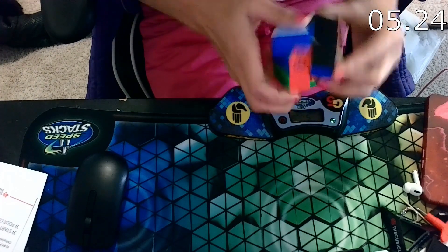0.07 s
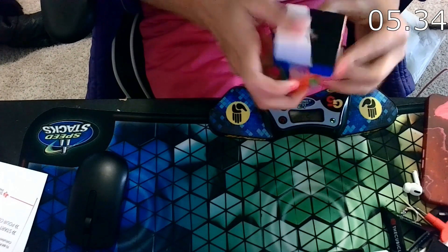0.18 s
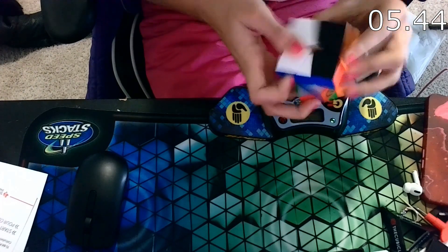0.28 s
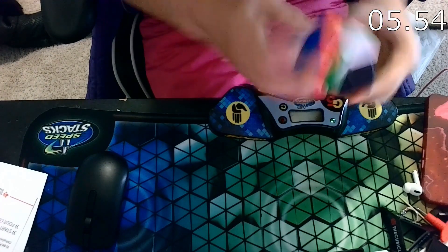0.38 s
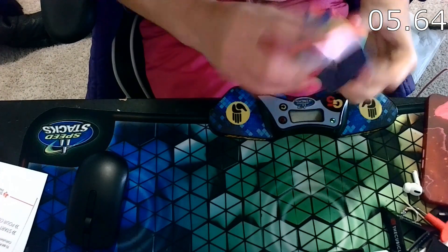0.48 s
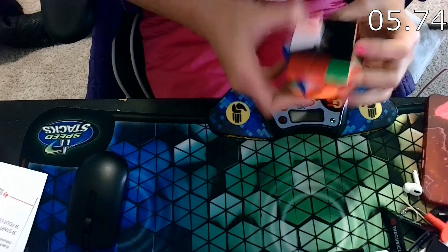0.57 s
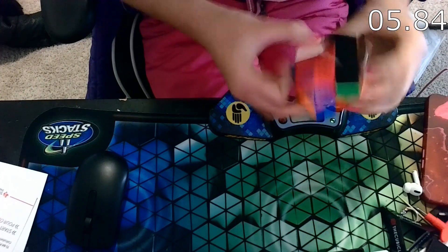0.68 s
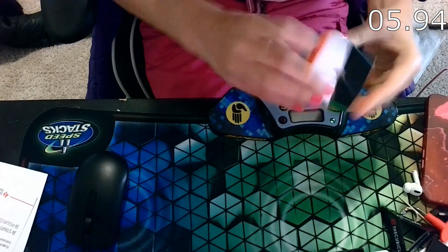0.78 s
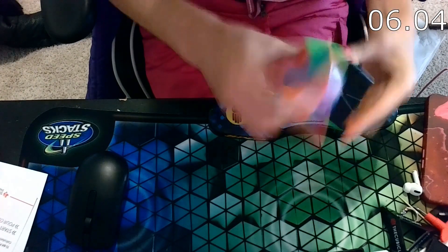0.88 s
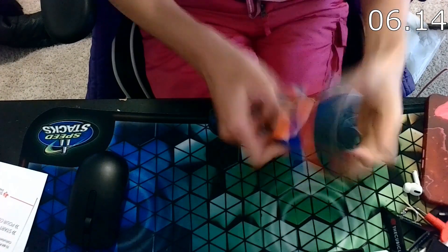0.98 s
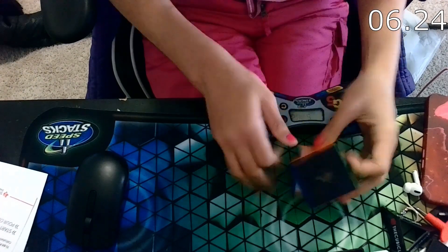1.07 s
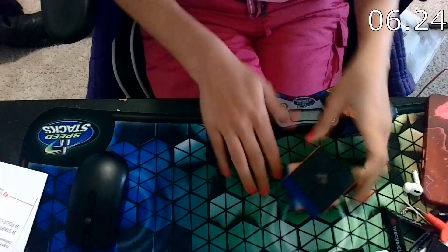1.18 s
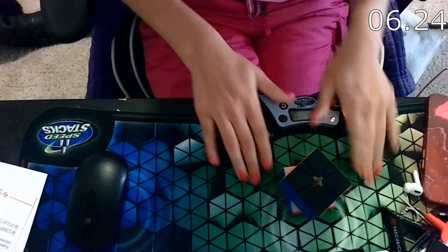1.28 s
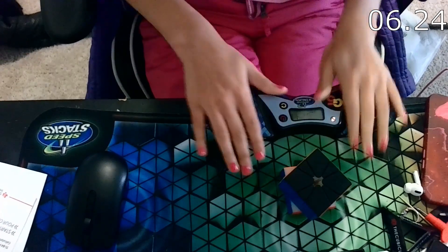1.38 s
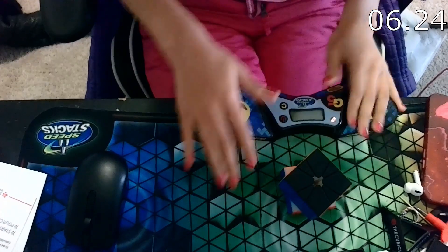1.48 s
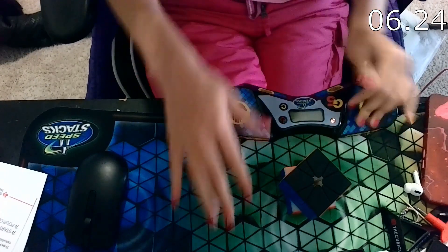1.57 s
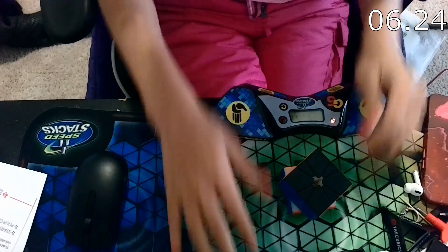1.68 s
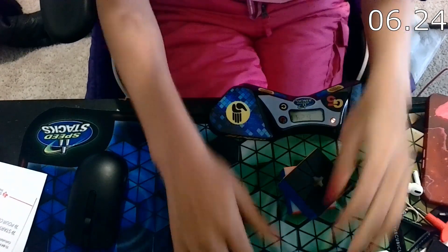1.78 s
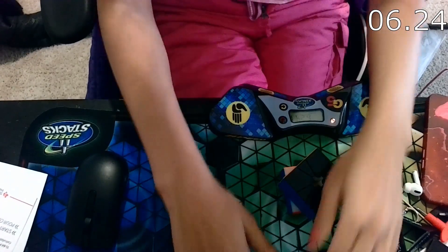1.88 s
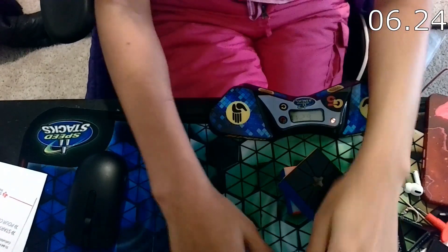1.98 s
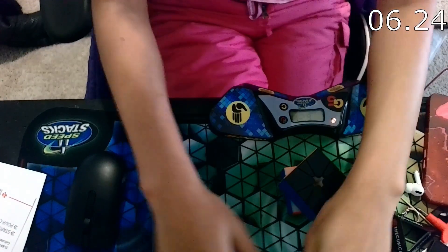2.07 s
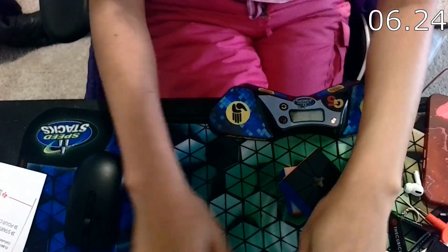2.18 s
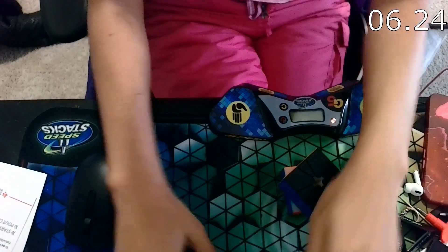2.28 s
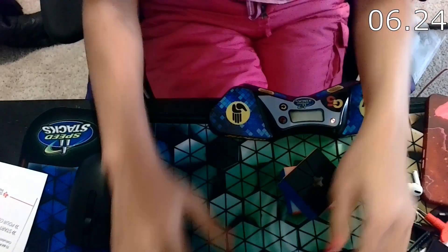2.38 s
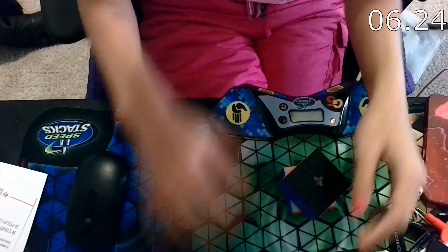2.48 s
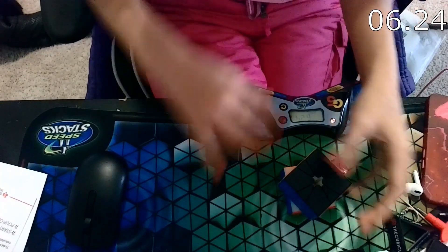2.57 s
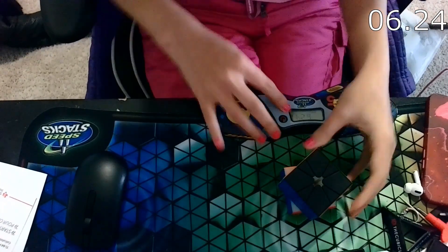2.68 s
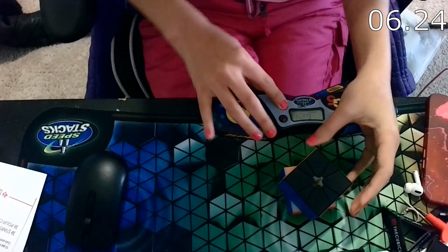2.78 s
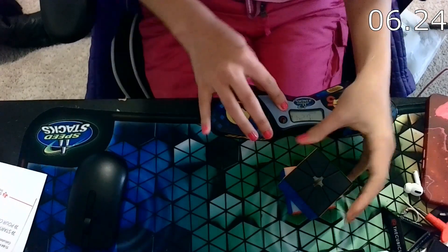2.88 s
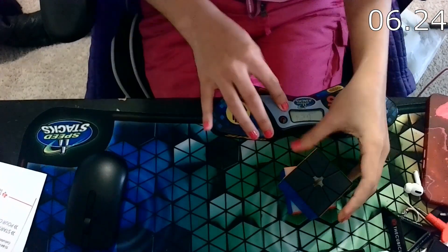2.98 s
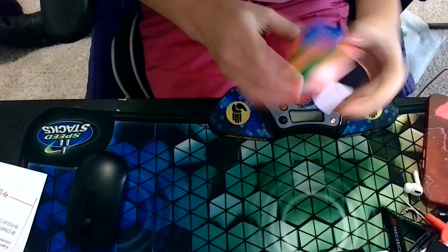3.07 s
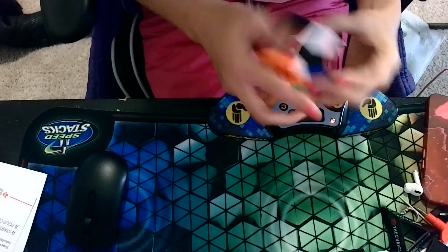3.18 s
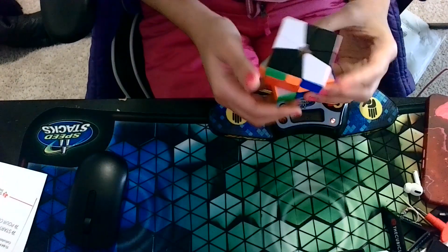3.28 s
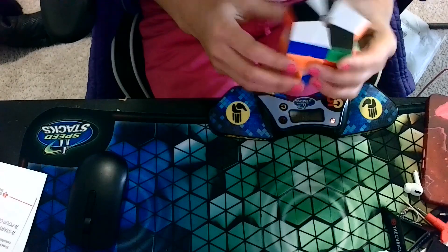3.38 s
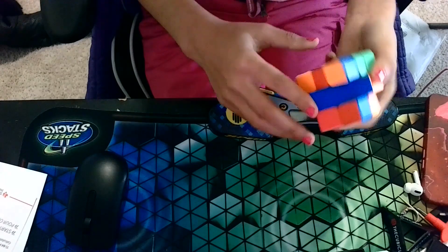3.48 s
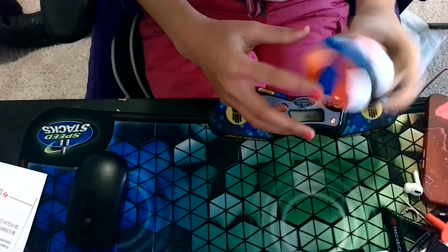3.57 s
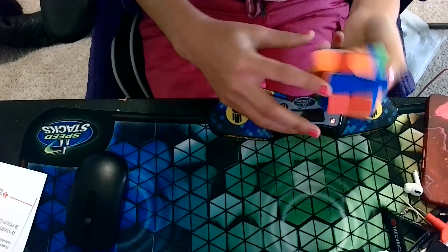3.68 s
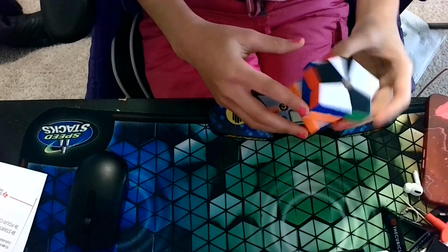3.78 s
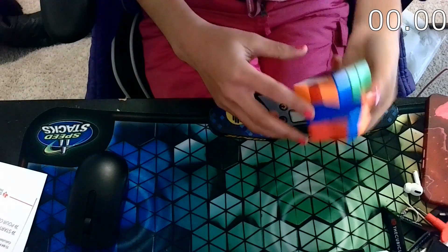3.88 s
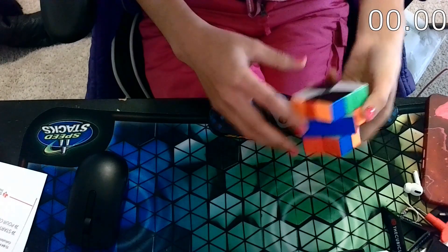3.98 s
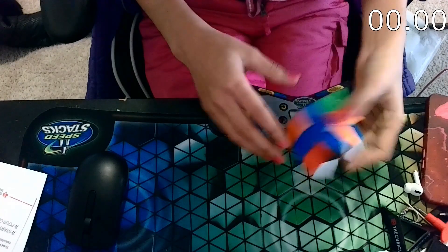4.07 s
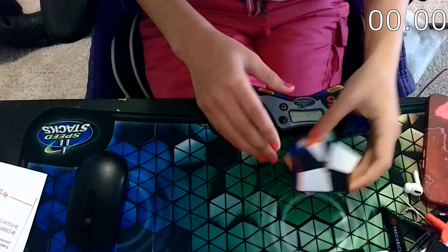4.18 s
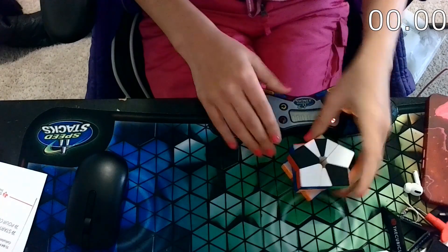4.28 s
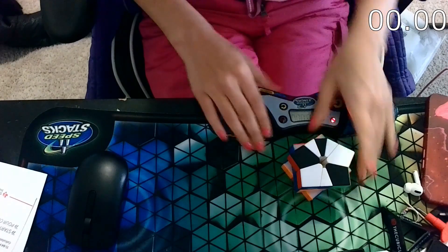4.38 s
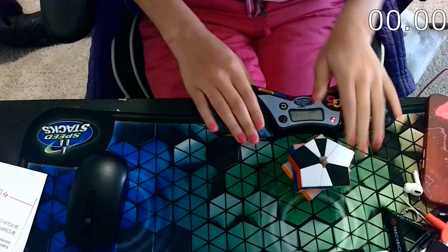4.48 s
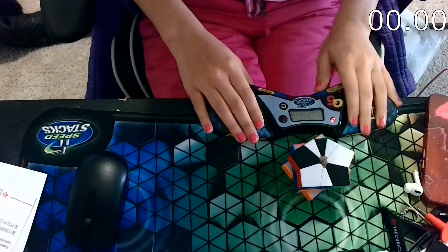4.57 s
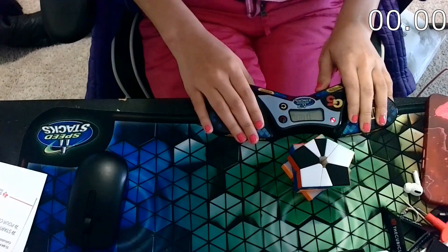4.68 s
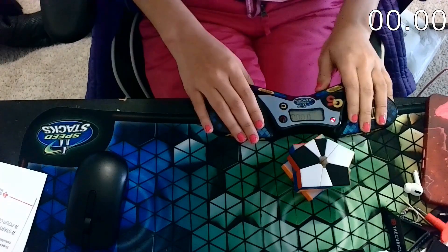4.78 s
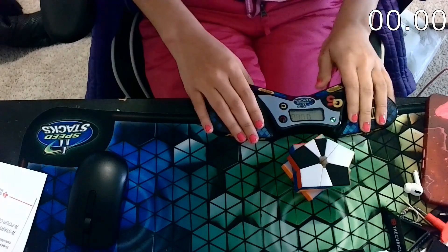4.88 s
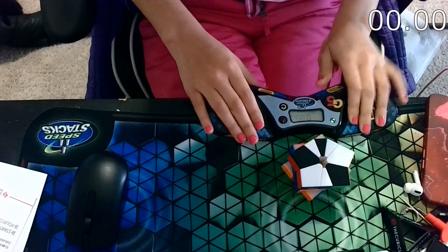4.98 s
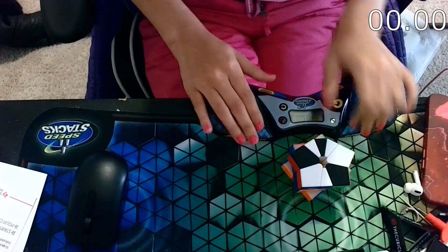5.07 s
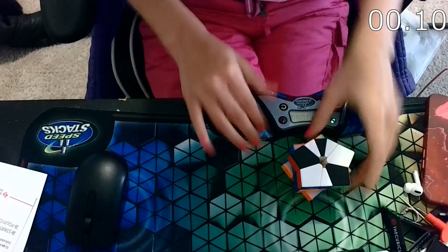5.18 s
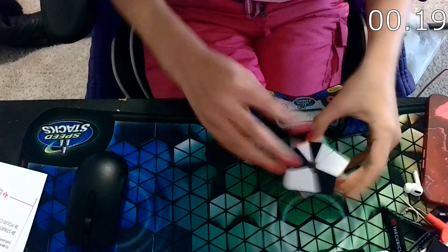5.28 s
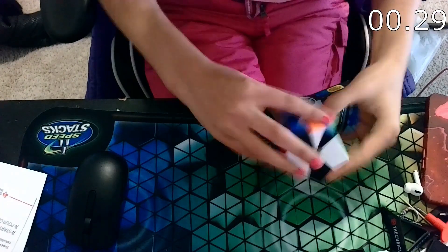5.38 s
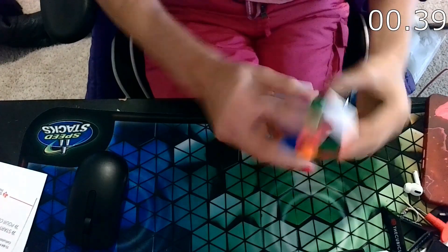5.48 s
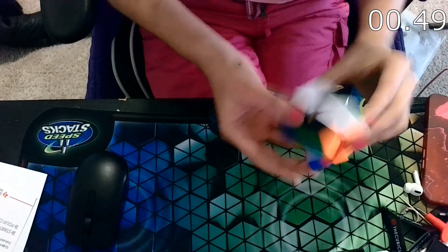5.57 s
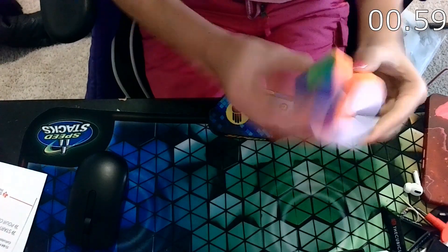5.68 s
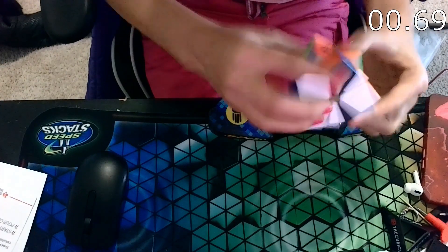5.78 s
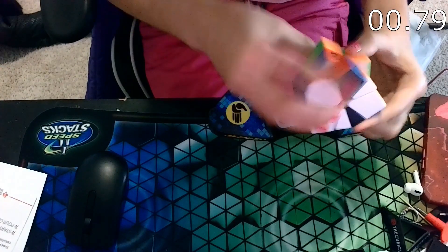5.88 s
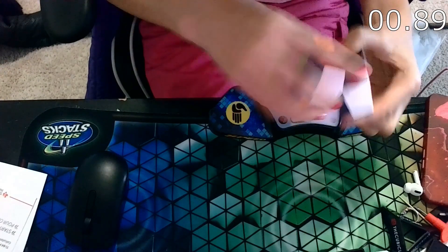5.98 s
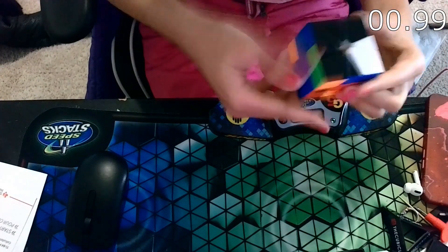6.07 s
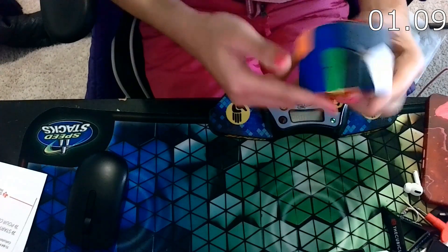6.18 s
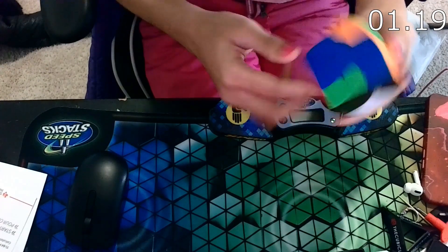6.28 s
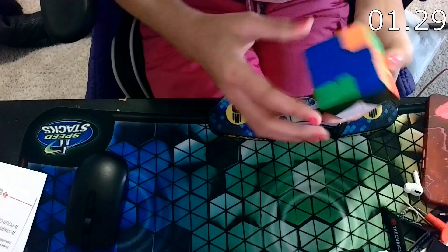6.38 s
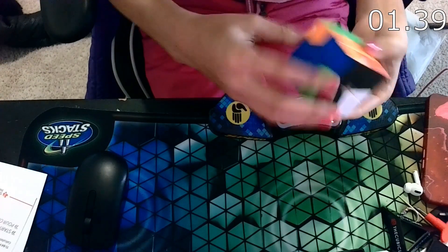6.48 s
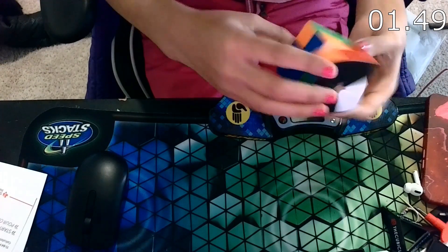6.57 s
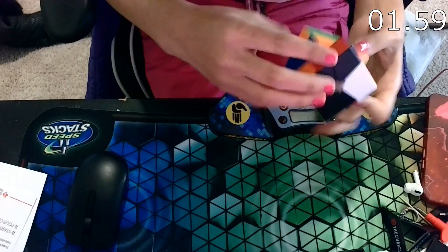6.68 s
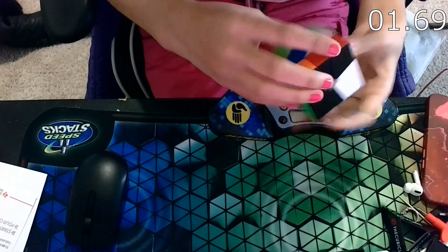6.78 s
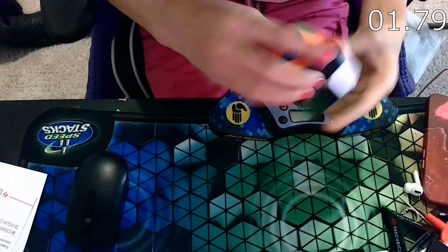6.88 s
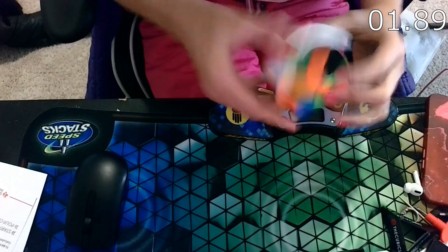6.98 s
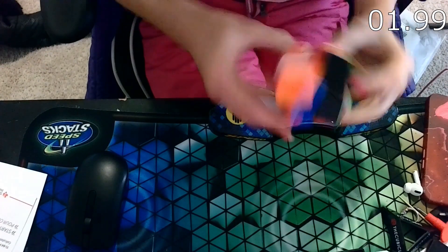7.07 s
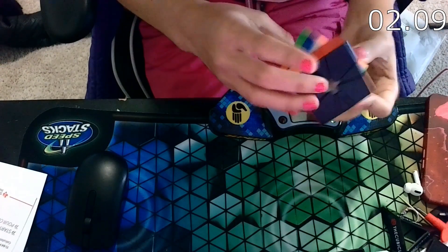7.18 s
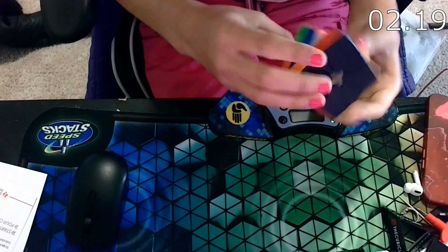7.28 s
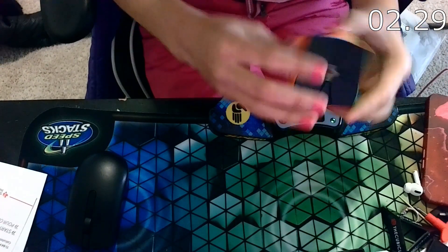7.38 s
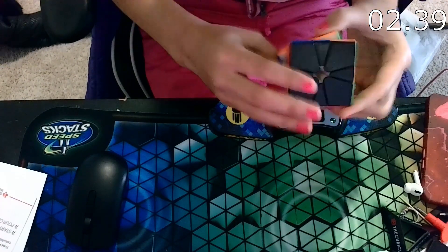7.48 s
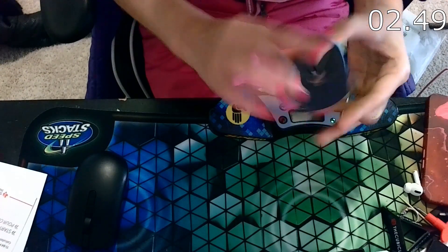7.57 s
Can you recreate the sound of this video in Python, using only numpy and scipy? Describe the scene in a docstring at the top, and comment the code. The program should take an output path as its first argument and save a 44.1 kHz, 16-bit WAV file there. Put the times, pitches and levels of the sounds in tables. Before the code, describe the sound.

Dense sharp clicks, ticks and dry scrapes of a hollow plastic puzzle end in a padded thump on a desk. Skin slides briefly over cloth, then a dozen light keyboard taps follow. After a small knock, a loose contact crackles and the room drops away for under a second. Hiss and faint handling return before another uneven run of loud snaps, close-miked in a small room.

```python
"""A plastic twisty puzzle is turned fast at a desk in a small room, close to a hissy microphone that overloads.
Its snaps, ticks and scrapes are noise filtered by the resonances of a thin shell and a hollow body.
It is dropped on the mat (damped desk modes), keys are tapped (cap, cavity and spring resonances), and hands
slide over the mat (dense filtered grains) before the next solve. In the pause, just after a last knock, the
sound cuts out briefly with a crackle, like a loose contact: pops and sparks over an amplifier's noise and tones."""
import sys
import numpy as np
from scipy import signal
from scipy.fft import rfft, irfft, next_fast_len
from scipy.io import wavfile
from scipy.ndimage import uniform_filter1d

SR = 44100
rng = np.random.default_rng(int(sys.argv[2]) if len(sys.argv) > 2 else 0)


def waveform_to_disk(signal):
    """Save audio, clipped to [-1, 1], as 16-bit WAV at the path in sys.argv[1]."""
    frames = np.transpose(np.atleast_2d(signal))
    scaled = np.clip(frames, -1, 1) * 32767
    samples = np.round(scaled).astype(np.int16)
    wavfile.write(sys.argv[1], SR, samples)


N = 337346
TIME = np.arange(N) / SR  # s, the whole scene
HIT = np.arange(SR // 7) / SR  # s, one blow
CUT_START, CUT_END = 3.103, 3.9  # s, the contact is open

# pieces snapping home: t/s, relative level/dB, hollow body re that level/dB, nominal contact length/s
CLICKS = [(0.0248, -2.5, -14, 0.0057), (0.0267, -2.5, -20.5, 0.0042), (0.04, -16.5, -13.5, .005),
          (0.0868, -9, -15, .0037), (0.186, -16, -11, .0035), (0.1954, -23.5, -10.5, 0.0083),
          (0.2206, -18, -12.5, 0.0032), (0.2817, -23.5, -13, .0077), (0.2922, -13.5, -9, 0.0067),
          (0.3397, -17.5, -6.5, 0.0032), (.3603, -17.5, -9, 0.0059), (0.3654, -16.5, -15, .0056),
          (0.3918, -15, -11.5, 0.0088), (.4253, -4.5, -11.5, 0.0042), (0.5072, -13.5, -10, .005),
          (0.5215, -10, -13, 0.0076), (0.53, -11.5, -15.5, .0048), (.547, -10, -16.5, 0.0087),
          (0.558, -17, -10.5, .0049), (0.5805, -17, -1.5, 0.0037), (0.6235, -20, -7, .0044),
          (0.6634, -16.5, -7, 0.004), (.696, -11.5, -13.5, 0.003), (0.7024, -16.5, -17.5, 0.007),
          (0.7597, -23.5, -9, .0027), (0.7704, -15.5, -16, .0051), (0.7975, -5.5, -10.5, 0.0041),
          (0.831, -21.5, -15, 0.0026), (0.851, -12.5, -7.5, .0024), (0.912, -17, -10.5, 0.0037),
          (.9296, -8, -13, .0058), (0.945, -19.5, -7, 0.005), (0.976, -14.5, -12, 0.0032),
          (.982, -16.5, -2, 0.0043), (1.0063, -17.5, -4, 0.0026), (1.0413, -9, -17, .0051),
          (1.0494, -14.5, -12.5, 0.0048), (1.1065, -10.5, -12.5, .0029), (1.116, -22.5, -1, 0.0069),
          (1.171, -30, -11, 0.005), (5.449, -26, -13, .0034), (5.4638, -18.5, -7.5, 0.0051),
          (5.478, -13.5, -13, 0.0052), (5.508, -7.5, -18.5, 0.0069), (5.5403, -20, -6, 0.01),
          (5.5816, -18, -8, 0.0043), (5.6175, -20, -13, .0025), (5.6326, -20.5, -11, .0048),
          (5.6424, -11, -10, .0064), (5.672, -16.5, -15, 0.0016), (5.695, -17.5, -9, 0.0043),
          (5.7181, -12, -20, .0083), (5.7256, -2, -15, 0.0061), (5.734, -6.5, -4, 0.0043),
          (5.806, -11, -7.5, 0.0033), (5.9419, -19, -9.5, 0.0037), (5.9958, -18.5, -2, 0.0033),
          (6.01, -18, -16, .0029), (6.026, -17.5, -9.5, 0.0026), (6.046, -18.5, -17, 0.0035),
          (6.061, -15, -9.5, 0.0083), (6.087, -25, -6, 0.004), (6.748, -30, -5, 0.0025),
          (6.794, -19.5, -10.5, 0.007), (6.82, -9.5, -11, 0.0039), (6.865, -23, -5.5, 0.0024),
          (6.957, -21, -3, 0.0043), (6.9734, -13, -8, 0.0041), (6.9818, -16.5, -17, 0.0074),
          (7.0053, -2.5, -11, 0.0049), (7.015, -12.5, -6, .007), (7.0756, -12, -12.5, .0035),
          (7.09, -12.5, -13.5, 0.0036), (7.1104, -15.5, -10, 0.0036), (7.1304, -7.5, -13, .0074),
          (7.5842, -15.5, -6, 0.0043)]
# resonances of a piece's thin shell: f/Hz, level/dB
SHELL = [(1500, -53.5), (2800, -22.5), (3600, -11), (4300, -5), (5000, 0), (5600, -4.5), (6300, -13.5),
         (8000, -24.5), (9500, -35), (12000, -43.5), (16000, -56)]
# resonances of the hollow body behind it: f/Hz, level/dB
HOLLOW = [(200, -34.5), (550, -28.5), (900, -15), (1200, -8.5), (1500, 1), (1900, 4.5), (2400, 1),
          (3100, -3.5), (4500, -38), (9000, -73)]


def amp(db):
    """Amplitude ratio of a level in decibels."""
    return 10 ** (np.asarray(db) / 20)


def unit(x):
    """Normalisation to an rms of 1."""
    return x / np.sqrt(np.mean(x ** 2) + 1e-20)


def along(points, hz):
    """Linear interpolation of (f/Hz, value) rows on a logarithmic frequency axis."""
    f, v = np.transpose(points)
    return np.interp(np.log(hz + 1), np.log(f + 1), v)


def level(rows):
    """Gain per sample interpolated in decibels from (t/s, level/dB) rows, -120 dB outside them."""
    s, db = np.transpose(rows)
    return amp(np.interp(TIME, s, db, left=-120, right=-120))


def decay(t60):
    """Exponential damping: a fall of 60 dB in t60 seconds."""
    return np.exp(-np.log(1000) * HIT / max(t60, 1e-4))


def colour(x, points, stretch=1):
    """Minimum-phase filter of the (f/Hz, level/dB) shape, its frequencies scaled by stretch."""
    m = 2 * next_fast_len(len(x))
    hz = np.fft.rfftfreq(m, 1 / SR) / stretch
    cepstrum = irfft(np.log(amp(along(points, hz))))
    # folding the cepstrum onto positive times makes the filter causal
    cepstrum[1:m // 2] *= 2
    cepstrum[m // 2 + 1:] = 0
    response = np.exp(rfft(cepstrum))
    return irfft(rfft(x, m) * response)[:len(x)]


def noise(points):
    """Stationary Gaussian noise of the given spectrum, at rms 1."""
    return unit(colour(rng.standard_normal(N), points))


def grains(rate, spread_db):
    """Shot noise at rms 1: random impulses of uneven size, on average rate a second."""
    spread = abs(spread_db) * np.clip(rng.standard_normal(N), -2, 2)
    sizes = rng.standard_normal(N) * amp(spread)
    return unit(sizes * (rng.random(N) < rate / SR))


def burst(envelope, points, stretch=1):
    """Impact on dense, quickly dying modes; its energy is that of 5 ms at rms 1."""
    ring = colour(rng.standard_normal(len(HIT)) * envelope, points, stretch)
    return ring / np.linalg.norm(ring) * np.sqrt(SR / 200)


def tones(lines):
    """Superposition of steady sines from (f/Hz, rms level/dB) rows."""
    return np.sqrt(2) * sum(amp(db) * np.sin(2 * np.pi * hz * TIME) for hz, db in lines)


def add(track, s, sound):
    """Superposition of a sound on the track from time s."""
    start = max(round(s * SR), 0)
    part = track[start:start + len(sound)]
    part += sound[:len(part)]


def microphone_hiss(hiss_db=-49):
    """Stationary noise whose spectrum is peaked by the microphone's resonances."""
    # f/Hz, level/dB
    hiss_shape = [(25, -39.5), (80, -16), (160, -15.5), (400, -18.5), (630, -17.5), (1050, -20.5),
                  (1500, -11.5), (2100, -17), (3000, -20.5), (3900, -17.5), (4400, 1), (4700, 0),
                  (4950, -9.5), (5250, 1), (5700, -19), (6200, -17), (7200, -27), (10000, -28.5),
                  (15500, -31.5)]
    return amp(hiss_db) * noise(hiss_shape)


def room_hum():
    """Faint steady tones in the room, as undamped sines."""
    # f/Hz, rms level/dB
    hum_lines = [(619.1, -76.5), (694.4, -90), (1497, -74)]
    return tones(hum_lines)


def loose_contact(spark_db=-17, fizz_db=-40, idle_db=-63, pop_t60=0.00094):
    """An open contact gives sparse impulses: pops and crackles over the amplifier's hiss and whine."""
    # the strongest crackles: t/s, relative level/dB
    sparks = [(3.144, -10), (3.198, -15.5), (3.281, -16), (3.416, -34), (3.485, -31), (3.509, -35),
              (3.626, -37.5), (3.714, -33.5)]
    # spectrum of a crackle: f/Hz, level/dB
    spark_shape = [(500, -37.5), (3000, -33), (6000, -13.5), (9000, -6.5), (12500, 5), (16000, 0.5)]
    # pops at the start of the cut, during its crackle and at its end: t/s, height before the cross-fade/dB
    pops = [(3.1022, -23), (3.1695, -29), (3.898, -55)]
    # noise spectrum of the bare amplifier: f/Hz, level/dB
    idle_shape = [(100, -22), (380, -24), (480, -12), (1150, -3), (1800, -8), (2700, -7), (5000, -8.5),
                  (9000, -9.5), (12200, 0.5), (14000, -6.5), (15800, -17)]
    # steady tones of the amplifier: f/Hz, rms level/dB
    whine_lines = [(446.8, -86), (667.5, -87), (958.2, -83), (1200, -86), (2078, -85), (2977, -84),
                   (4963, -79)]
    arcs = grains(rate=900, spread_db=0)
    fizzing = level([(CUT_START, 0), (3.315, 0)])
    out = amp(fizz_db) * fizzing * unit(colour(arcs, spark_shape))
    for s, db in sparks:
        add(out, s, amp(spark_db + db) * burst(decay(0.0023), spark_shape))
    for s, db in pops:
        add(out, s, amp(db) * decay(pop_t60))
    return out + amp(idle_db) * noise(idle_shape) + tones(whine_lines)


def room(x, first_wall=0.0064, build=0.0017):
    """Reverberation: the walls answer after a short gap, a fresh random tail cross-faded in every half second."""
    # reverberation time: f/Hz, t60/s
    reverb_times = [(200, 0.36), (1500, 0.33), (5000, 0.35), (12000, 0.69)]
    # what the walls return: f/Hz, level/dB
    wall_shape = [(100, 3), (1000, 1.5), (2000, 0), (3200, -2), (4300, -2.5), (5200, -0.5), (6500, -6),
                  (10000, -8.5), (15000, -11.5)]
    out = np.zeros(N)
    for knot in np.arange(0, N / SR + 1 / 2, 1 / 2):
        # noise that dies at each frequency's own rate
        hz, t, z = signal.stft(rng.standard_normal(SR // 2), SR, nperseg=256)
        falling = amp(-60 * t / along(reverb_times, hz)[:, None])
        tail = signal.istft(z * falling, SR, nperseg=256)[1]
        since_wall = np.maximum(np.arange(len(tail)) / SR - first_wall, 0)
        tail *= 1 - np.exp(-since_wall / build)
        # the cross-fade keeps equal power
        share = np.maximum(1 - 2 * abs(TIME - knot), 0)
        out += signal.fftconvolve(x * np.sqrt(share), tail / np.linalg.norm(tail))[:N]
    return colour(out, wall_shape)


def hands(slide_db=-1, jerk_db=-2.0):
    """Stick-slip friction: skin drags over the cloth in dense fine grains; each slide swells and fades."""
    # hands sliding on the mat: t of fastest motion/s, relative level/dB, rise to it/s, fall from it/s
    slides = [(1.26, -36, 0.099, 0.23), (2.69, -43.5, 0.039, 0.029), (4.49, -39, .19, .12),
              (5.18, -53, 0.15, 0.099)]
    # spectrum of skin on cloth: f/Hz, level/dB
    skin_shape = [(35, -56), (60, -24.5), (166, -11), (209, -26.5), (503, -35.5), (679, -18.5), (855, -15),
                  (1010, -10), (1180, -12), (2010, -8), (2310, -12), (5060, 3), (6840, -16.5), (15000, -38)]
    speed = np.zeros(N)
    for s, db, rise, fall in slides:
        width = np.where(TIME < s, rise, fall)
        speed += amp(db) * np.exp(-((TIME - s) / width) ** 2)
    catching = unit(uniform_filter1d(rng.standard_normal(N), size=900))
    fibres = grains(rate=4000, spread_db=3)
    return amp(slide_db + jerk_db * catching) * speed * unit(colour(fibres, skin_shape))


def bumps(tap_t60=0.054, desk_db=-1, cushion=0.0024):
    """Modal excitation through a soft layer: puzzle and hands land on the mat, softening the desk's thud."""
    # soft blows on the mat: t/s, relative desk thud/dB, tap/dB
    blows = [(1.106, -28.5, -28), (1.171, -69, -37.5), (2.647, -55, -40.5), (2.660, -53, -41),
             (4.247, -66, -43.5), (4.476, -58, -46.5), (4.626, -53, -42.5), (4.974, -60, -49)]
    # damped modes of the desk: f/Hz, level/dB, t60/s
    desk_modes = [(107.3, -4.5, 0.14), (131, -4.5, 0.17), (178, 0.5, 0.12), (210, -14, 0.31),
                  (270.3, 3.5, 0.066), (320, -9.5, 0.15), (390, -8, 0.078), (440, -14.5, 0.17)]
    # spectrum of the tap: f/Hz, level/dB
    tap_shape = [(150, -28), (400, -10), (700, -1.5), (1200, 0), (2500, -8.5), (5000, -5.5), (9000, -35.5)]
    out = np.zeros(N)
    thud = sum(amp(db) * np.sin(2 * np.pi * hz * HIT) * decay(t60) for hz, db, t60 in desk_modes)
    thud *= 1 - np.exp(-HIT / cushion)
    for s, thud_db, tap_db in blows:
        tap = burst(decay(tap_t60), tap_shape)
        add(out, s, amp(desk_db + thud_db) * thud + amp(tap_db) * tap)
    return out


def keys_and_knock(cap_db=-8.5, cavity_db=-13, tone_db=-18, spring_db=-30, spring_t60=.14):
    """Resonators under an impact: for keys a cap, cavity and spring; a last knock is modelled the same way."""
    # key strokes and, last, a knock just before the cut, perhaps the timer's reset:
    # t/s, relative level/dB, cap t60/s, cavity f/Hz, relative cavity level/dB
    strikes = [(1.938, -15, 0.032, 1220, -24), (1.947, -8, 0.016, 668, -16.5), (2.028, -17, .04, 680, -8),
               (2.09, -19, 0.045, 1220, -13.5), (2.0969, -6, 0.02, 980, -15.5), (2.11, -18, .036, 936, -17),
               (2.14, -13, 0.036, 1190, -25), (2.208, -18, 0.095, 710, -13), (2.243, -14.5, 0.035, 864, -4),
               (2.2793, -15, 0.032, 865, -27.5), (2.297, -13, 0.059, 1042, -22.5),
               (2.3611, -12.5, 0.063, 529, -9), (3.092, -23, .012, 1020, -2)]
    # spectrum of a middling cap: f/Hz, level/dB
    cap_shape = [(300, -49), (450, -29), (600, -16.5), (900, -5.5), (1250, -5), (1800, -0.5), (2700, 3),
                 (3300, 4), (3700, 0), (5200, 3.5), (6500, -14), (8000, -23.5), (9000, -64.5),
                 (15000, -45.5)]
    # damped resonance of the cavity: multiple of its pitch, level/dB
    cavity_shape = [(.5, -49), (.76, -12), (1, 4.5), (1.3, -8), (2.201, -30.5)]
    # spectrum of the spring: f/Hz, level/dB
    spring_shape = [(5500, -27), (7300, -7.5), (8150, -5.5), (8700, -29), (11000, -42.5)]
    # a middling key; bigger ones have a deeper cavity, ring longer and clack duller
    key_hz, key_t60, key_bright, ring_power, bright_power = 850, .045, 1.052, 1.6, 0.12
    out = np.zeros(N)
    for s, db, cap_t60, hz, ring_db in strikes:
        dying = decay(key_t60 * (key_hz / hz) ** ring_power)
        resonance = [(hz * multiple, side_db) for multiple, side_db in cavity_shape]
        cavity = amp(cavity_db) * burst(dying, resonance)
        tone = np.sin(2 * np.pi * hz * HIT) * dying * (1 - decay(0.0091))
        cavity += amp(tone_db) * tone
        cap = burst(decay(cap_t60), cap_shape, key_bright * (hz / key_hz) ** bright_power)
        spring = burst(decay(spring_t60), spring_shape)
        strike = amp(cap_db) * cap + amp(ring_db) * cavity + amp(spring_db) * spring
        add(out, s, amp(db) * strike)
    return out


def chatter(length, attack):
    """Repeated contact: two parts buzz together for a few milliseconds, a noise envelope, then rest."""
    return (1 - np.exp(-HIT / attack)) * np.exp(-(HIT / length) ** 2)


def piece_hz(s, scatter=0.021):
    """Resonance under changing load: the pitch of whichever piece is struck at time s."""
    # the shell's mean pitch shifts as the grip changes: t/s, f/Hz
    grip_pitch = [(0, 4997), (.55, 5065), (.72, 4850), (.95, 4664), (5.5, 4570), (6.0, 4940), (7.0, 4900),
                  (7.1, 4760), (7.6, 4840)]
    return np.interp(s, *np.transpose(grip_pitch)) * np.exp(scatter * rng.standard_normal())


def snap(db, body_db, hz, length, shell_db=-.5, hollow_db=0, hold=0.82,
         shell_attack=.0003, body_attack=0.0021):
    """Impact on two resonators: a contact rings a piece's thin shell and the hollow body behind it."""
    shell_hz = 4900  # pitch at which SHELL stands unscaled
    shell = amp(shell_db) * burst(chatter(hold * length, shell_attack), SHELL, hz / shell_hz)
    body = amp(hollow_db + body_db) * burst(chatter(hold * length, body_attack), HOLLOW)
    return amp(db) * (shell + body)


def rubbing(rub_db=-35.5, body_db=-3.5, reach=0.016, grip=0.55):
    """Dry friction as shot noise: layers scrape around each snap, the more the harder they are turned."""
    coarse = TIME[::64]
    effort = sum(amp(grip * db) * np.exp(-((coarse - s) / reach) ** 2) for s, db, *_ in CLICKS)
    contacts = grains(rate=900, spread_db=5)
    sound = unit(colour(contacts, SHELL)) + amp(body_db) * unit(colour(contacts, HOLLOW))
    return amp(rub_db) * np.interp(TIME, coarse, effort) * sound


def rattle():
    """Irregular impact train: while a layer slides, its pieces tick past their neighbours unevenly."""
    # layers sliding round with loose pieces: start t/s, length/s, median tick level/dB
    turns = [(.147, .1, -34), (0.3746, .04, -27), (0.659, .075, -27.5), (0.756, .06, -25.5),
             (.865, .06, -29.5), (0.99, .048, -24), (5.413, .025, -41), (5.489, .065, -25),
             (5.917, .02, -27.5), (6.63, .04, -41.5), (6.779, .165, -28), (7.035, .03, -26),
             (7.608, .04, -31)]
    ticks_per_s, tick_scatter_db = 80, 2.5  # mean rate, standard deviation
    tick_body_db, tick_s = -6, .004  # body re tick level, nominal contact length
    out = np.zeros(N)
    for start, length, db in turns:
        gaps = rng.uniform(1 / 2, 3 / 2, size=24) / ticks_per_s
        sizes = rng.standard_normal(size=24)
        for t, size in zip(np.cumsum(gaps) - gaps[0], sizes):
            if t < length:
                tick_db = db + tick_scatter_db * size
                add(out, start + t, snap(tick_db, tick_body_db, piece_hz(start), tick_s))
    return out


def puzzle(catch_db=-18, catch_lead=.004, settle_db=-15, settle_lag=0.009):
    """Successive impacts: a corner catches lightly, the layer snaps home, then a loose neighbour settles."""
    out = np.zeros(N)
    timing = rng.uniform(1 / 2, 3 / 2, (len(CLICKS), 2))
    for (s, db, body_db, length), (early, late) in zip(CLICKS, timing):
        hz = piece_hz(s)
        contacts = [(-catch_lead * early, catch_db), (0, 0), (settle_lag * late, settle_db)]
        for offset, contact_db in contacts:
            add(out, s + offset, snap(db + contact_db, body_db, hz, length))
    return out


def scene(room_db=-8):
    """Superposition of direct sound, reverberation and noise, cross-faded to the open contact and back."""
    direct = puzzle() + rattle() + rubbing() + keys_and_knock() + bumps()
    live = direct + amp(room_db) * room(direct) + hands() + microphone_hiss() + room_hum()
    is_open = (TIME > CUT_START) & (TIME < CUT_END)
    cut = uniform_filter1d(is_open * 1.0, size=128)
    return ((1 - cut) * live + cut * loose_contact())[None]


def record(dry, top=0.69, hardness=7, lopsided=0.016, top_hz=15900):
    """Saturation: the input overloads a little unevenly on the hardest snaps, then is band-limited."""
    ceiling = top * (1 + lopsided * np.sign(dry))
    clipped = dry / (1 + abs(dry / ceiling) ** hardness) ** (1 / hardness)
    m = next_fast_len(N + SR // 2)
    passed = np.fft.rfftfreq(m, 1 / SR) < top_hz
    return irfft(rfft(clipped, m) * passed, m)[..., :N]


dry = scene()
out = record(dry)
waveform_to_disk(out)
```